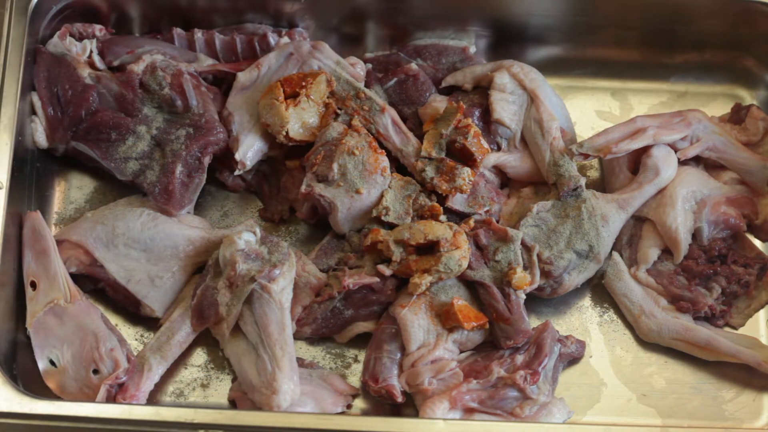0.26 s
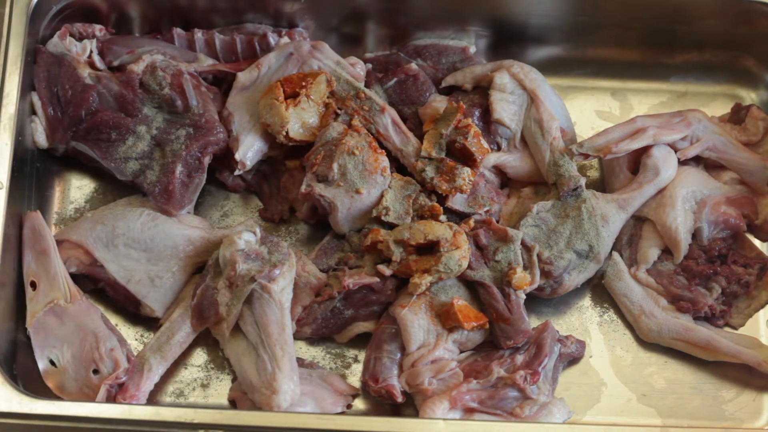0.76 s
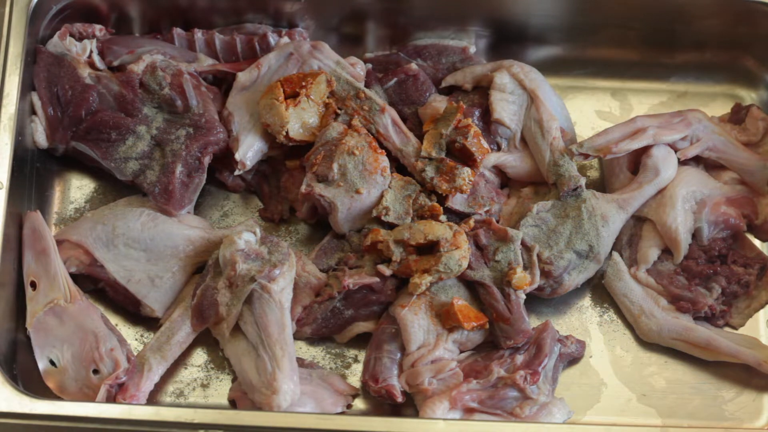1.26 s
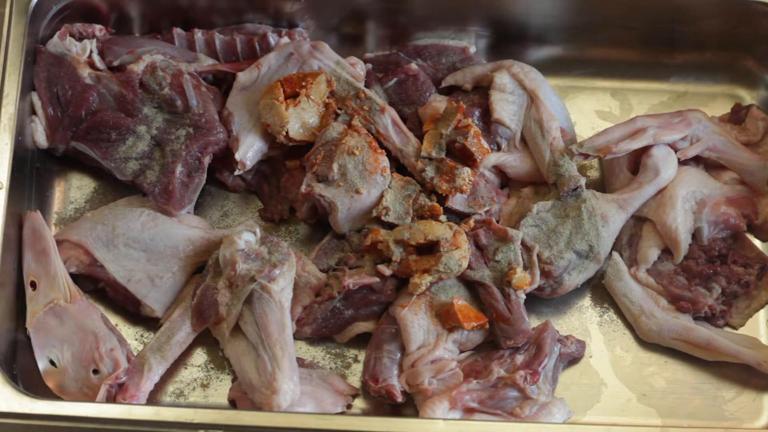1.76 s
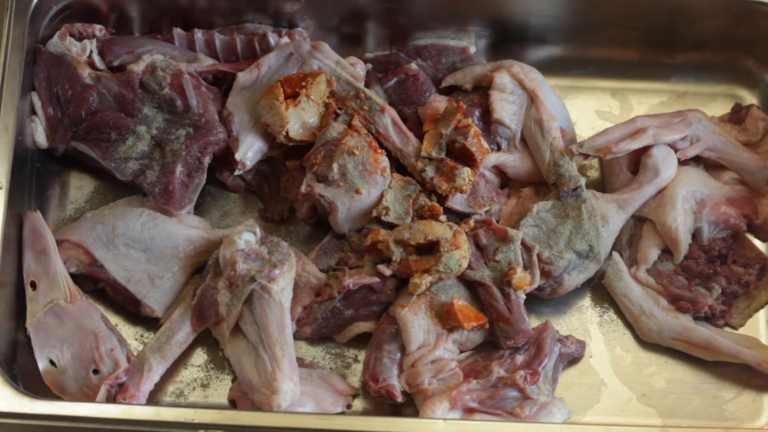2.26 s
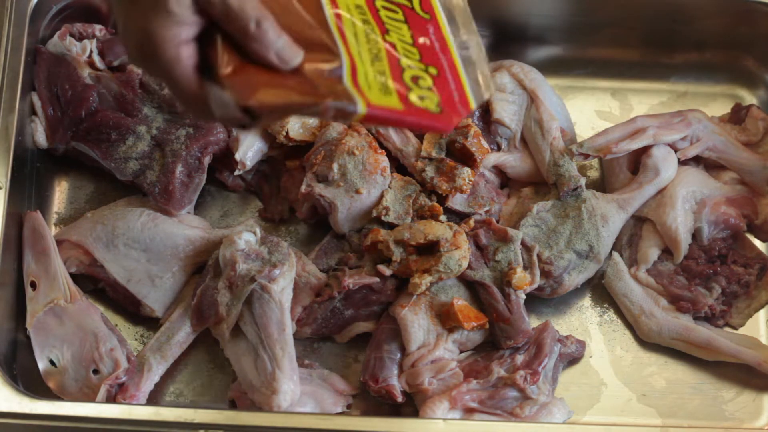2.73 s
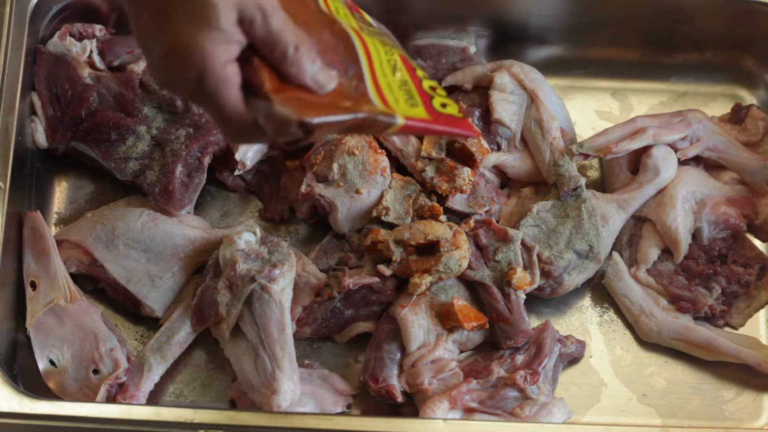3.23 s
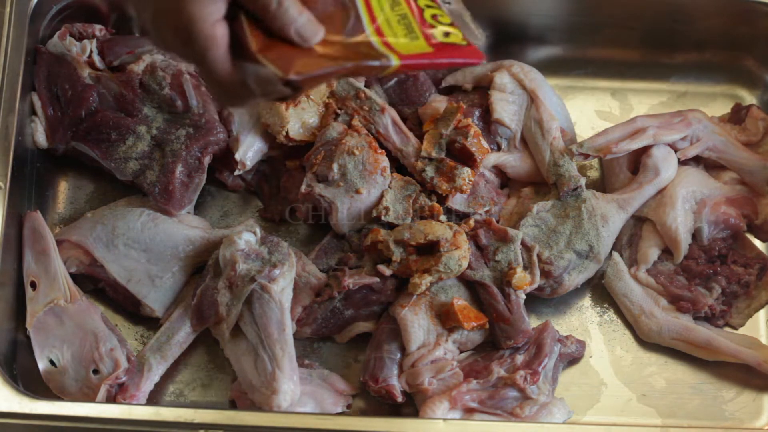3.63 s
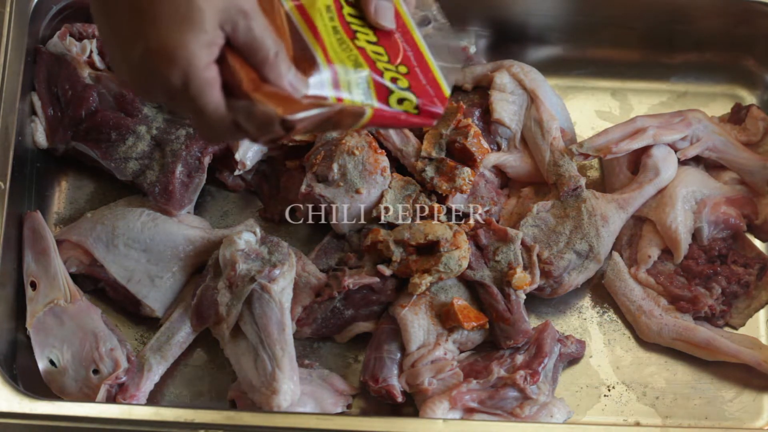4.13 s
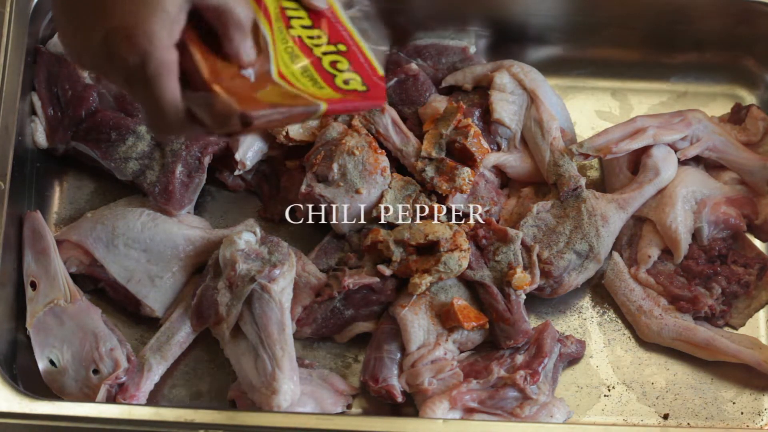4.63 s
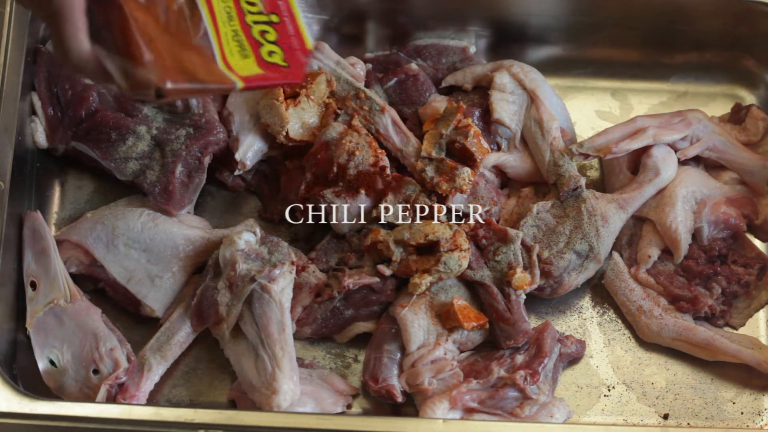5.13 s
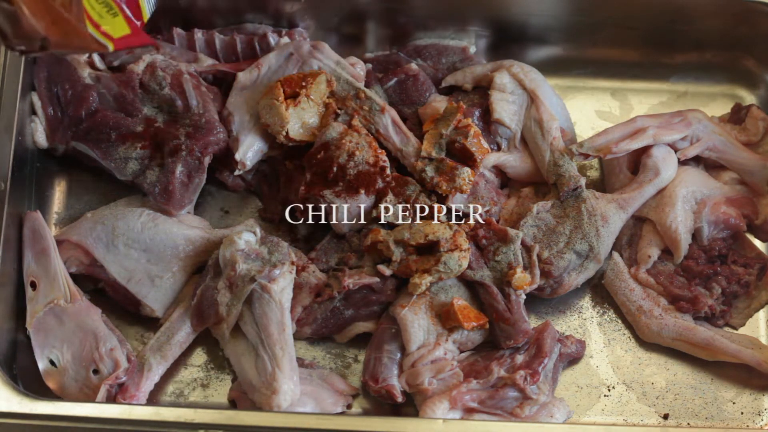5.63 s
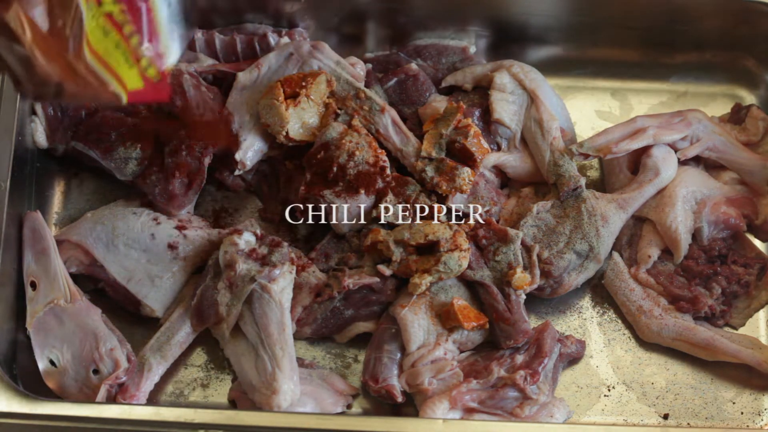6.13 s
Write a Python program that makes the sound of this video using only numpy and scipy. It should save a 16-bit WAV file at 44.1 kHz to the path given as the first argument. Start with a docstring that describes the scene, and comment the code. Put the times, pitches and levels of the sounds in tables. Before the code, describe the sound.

In a small quiet kitchen, a plastic packet of powder is handled close to the microphone. Dry, bright film snaps and fine crackle begin lightly, thicken from 0.5 to 1.3 seconds with a soft powder swish around 0.7, then thin out. A denser cluster runs from about 1.7 to 2.4, including another hollow powder slide at 1.8. At 2.5 come three very quick, faint, high steel touches. Sparse snaps follow, with sharper ones near 3.0, then a lull. A hard crack at 3.64 opens the loudest flurry, lasting to roughly 4.3. Uneven crinkling continues, with bright bursts near 4.65 and 5.4. Two close, breathy powder slides come at 5.9 to 6.0, then fainter grains and sparse ticks until the end near 6.4. Reflections are short; steady soft air, barely audible hum and thin high hiss remain underneath.

```python
"""Spice packet over a steel tray

A hand works a plastic packet in a small kitchen: the film buckles in sharp snaps (step plus ringing
flutter) and crackles finely (ticks and noise in three bands). Powder slides in the hollow of the bag
(resonated grains), steel clinks in three quick touches (decaying modes). Behind: air, faint hum, hiss."""
import sys
import numpy as np
from scipy import signal
from scipy.fft import rfft, irfft
from scipy.io import wavfile
from scipy.ndimage import uniform_filter1d, minimum_filter1d

SR = 44100
rng = np.random.default_rng(int(sys.argv[2]) if len(sys.argv) > 2 else 0)


def generate_wav(sig):
    """Save sig (samples, or channels by samples) to the path in sys.argv[1] as 16-bit PCM at SR."""
    pcm = np.round(np.clip(np.atleast_2d(sig).T, -1, 1) * 32767).astype(np.int16)
    wavfile.write(sys.argv[1], SR, pcm)


N = 281358


def gain_of(db):
    """Decibels to amplitude."""
    return 10 ** (np.asarray(db) / 20)


def evened(x):
    """Scales to rms 1."""
    return x / np.sqrt(np.mean(x ** 2) + 1e-20)


def read(points, hz):
    """Interpolates a curve at hz, straight on a log axis."""
    point_hz, value = np.transpose(points)
    return np.interp(np.log(hz + 1), np.log(point_hz + 1), value)


def add(mix, start_s, sound):
    """Mixes a sound in at start_s."""
    part = mix[round(start_s * SR):][:len(sound)]
    part += sound[:len(part)]


def colour(x, points):
    """Causal minimum-phase filter with the given spectrum."""
    spectrum_db = np.maximum(read(points, np.fft.rfftfreq(4096, 1 / SR)), -100)
    half = np.log(gain_of(spectrum_db))
    full = np.conj(signal.hilbert(np.r_[half, half[-2:0:-1]]))
    impulse = np.fft.ifft(np.exp(full)).real[:2048]
    return signal.oaconvolve(x, impulse)[:len(x)]


def resonate(x, hz, width_hz):
    """Resonance of gain 1: shifts hz down to zero, smooths, shifts back."""
    turn = np.exp(2j * np.pi * np.cumsum(hz * np.ones(len(x))) / SR)
    pole = np.exp(-np.pi * width_hz / SR)
    return 2 * (turn * signal.lfilter([1 - pole], [1, -pole], x / turn + 1e-18)).real


def ticks(per_s, spread_db, ring_ms):
    """Random slips of uneven size, each a short dying burst of noise."""
    size = gain_of(spread_db * np.minimum(rng.exponential(1, N), 4))
    slips = size * (rng.random(N) < per_s / SR)
    dying = signal.lfilter([1], [1, -np.exp(-1000 / (ring_ms * SR))], slips)
    return evened(dying * rng.standard_normal(N))


# Buckles of the film. Each row: start in seconds, energy in dB (0 = rms 1 for 1 ms),
# ring of the patch in Hz, brightness in dB per octave, flutter decay in ms.
BUCKLES = [(.0351, -31, 5210, 5, 3.1), (0.0549, -21, 5800, 3.5, 3.9), (0.0749, -18, 2600, 8, 0.68),
           (0.124, -22.5, 5100, 1, 1.6), (.181, -26, 3570, 5, 1.8), (.3555, -34, 5250, 0, 3.2),
           (0.4266, -26, 2180, 1, 4.6), (.481, -28, 5470, 1, 3.3), (.496, -21.5, 4070, 4, 2.6),
           (.531, -19, 5300, 4, 4), (0.616, -18, 6420, 5.5, 5.7), (0.6892, -28, 5470, 3, 2.7),
           (.7, -14.5, 2600, 0, 3.6), (0.7337, -12.5, 5800, 2.5, 3.4), (.8088, -14.5, 5900, 6, 1.3),
           (0.8446, -18.5, 5600, 9, 4.4), (0.935, -17.5, 6100, 5, 4.6), (0.9668, -20.5, 6200, 3, 4.6),
           (0.9912, -17.5, 4520, 5.5, 3.5), (1.004, -17.5, 5800, 6.5, 3), (1.0216, -25, 4780, 2.5, 2.2),
           (1.045, -26, 4600, 6, 3.5), (1.0567, -17.5, 5470, 3.5, 4.8), (1.1136, -20.5, 7450, 1, 3.1),
           (1.1795, -32, 8050, 8, 2.8), (1.216, -21.5, 5000, 6, 2.8), (1.263, -21, 7700, 7, 2.4),
           (1.322, -26, 7670, 6, 5.1), (1.347, -24.5, 2260, 4, 2.3), (1.447, -28.5, 2200, 2, 3.2),
           (1.52, -29, 5900, 8, 2.8), (1.5794, -25, 2110, -2, 5.9), (1.6933, -16, 2670, 1, 4.7),
           (1.737, -10.5, 5550, 0.5, 4.1), (1.7618, -12.5, 6000, 0, 1.7), (1.772, -15, 6100, 1, 4.6),
           (1.8144, -12, 2340, -7, 2.1), (1.842, -19.5, 1970, -9, 2.3), (1.894, -21.5, 4780, 5, 2.2),
           (1.9114, -16, 2420, 3, 2.2), (1.9423, -22, 3790, 2, 2.4), (1.97, -24, 2500, -1, 3.2),
           (1.9944, -14, 2230, 4, 2), (2.0607, -20, 5050, -2.5, 4.2), (2.0753, -18.5, 4780, 13, 3.8),
           (2.091, -12.5, 3100, 6.5, 2.6), (2.1032, -13, 6750, 1, 2.7), (2.114, -12, 2100, 4, 2.7),
           (2.147, -11.5, 4440, .6, 3.6), (2.1574, -19, 5800, 3, .6), (2.181, -19.5, 6500, 2, 0.66),
           (2.2345, -12, 4260, 2.5, 0.91), (2.265, -17, 4650, 0.5, 3.8), (2.349, -16.5, 5660, 3.5, 2.5),
           (2.376, -26, 1940, 2, 2.1), (2.4414, -17, 3000, -10, 3.2), (2.4416, -14, 5300, 7.5, 1),
           (2.466, -39, 2580, 7, 3.3), (2.586, -19, 5200, -1, 1.4), (2.7463, -13.5, 4800, 8, 0.43),
           (2.7828, -24, 5400, -3, 2.9), (2.8713, -30, 5300, 6, 5.6), (2.9599, -10.5, 5260, 9.5, 1.1),
           (2.9845, -12, 6340, 5, 4.1), (2.985, -14.5, 1940, -12, 2), (3.0761, -25, 4030, -2, 2.8),
           (3.1188, -17.5, 3620, 7, 1.7), (3.1218, -24, 5300, 2, 1.8), (3.1301, -19, 4050, 1.5, 1.7),
           (3.1557, -18, 2130, -1, 3.5), (3.185, -27, 3540, -7, 3.9), (3.2449, -34, 5630, -2, 2.3),
           (3.4052, -30, 5600, 1, 1.2), (3.6249, -17.5, 3640, -.5, 3.7), (3.629, -14.5, 2480, 0, 2.4),
           (3.6427, -3, 4730, 1, 0.43), (3.6492, -7, 3830, 3.5, 5.1), (3.6538, -13, 4700, 12, 1.4),
           (3.6688, -17, 4820, 2, 1.7), (3.6891, -15.5, 2300, -2, 1.7), (3.6989, -17, 2150, -2, 1.9),
           (3.7504, -13, 4360, -2, 1.1), (3.779, -25, 2450, 5, 1.9), (3.79, -19, 2500, -5, 3.4),
           (3.8012, -12.5, 5000, 6, 0.6), (3.8055, -11, 7240, 5.5, 1.2), (3.8158, -11, 3860, 9, 1.9),
           (3.8527, -27, 4570, 3, 1.8), (3.8726, -23, 5470, 0, 1.4), (3.878, -14, 2380, 5.5, 3.2),
           (3.9013, -8, 5260, 3.5, 1.9), (3.9047, -12.5, 2870, -10, 4.9), (3.941, -10.5, 2370, 6, 4.5),
           (3.9699, -8, 5500, 4.5, 2), (3.985, -9.5, 9300, 16, 2), (4.0287, -20, 4230, 9, 2.4),
           (4.045, -23, 3700, 7, 2.1), (4.0725, -19, 5560, 10, 2.5), (4.0917, -24.5, 5340, 2, 1.1),
           (4.1274, -27, 3530, -1, 2.5), (4.1339, -22, 3660, 0, 2.7), (4.18, -15.5, 5300, 5.5, 2.8),
           (4.185, -15, 4360, 4.5, 3.1), (4.1998, -17, 3570, 4, .4), (4.222, -13.5, 3070, -3, 1.1),
           (4.243, -10.5, 5560, 7, 3.1), (4.2486, -6, 3160, -1, 2.1), (4.278, -22, 4260, 6, 1.8),
           (4.3384, -19.5, 2330, 1, 2), (4.3451, -19.5, 6680, 6.5, 2.1), (4.3968, -24, 1690, -1.5, 2.5),
           (4.4436, -13.5, 5500, 15, 2.2), (4.4587, -18, 5640, -5, 1.9), (4.4996, -23, 4450, 1.5, 2),
           (4.543, -23.5, 4000, -3, 2.6), (4.587, -23.5, 2310, 0, 3.4), (4.6065, -15, 2230, 1, 2.6),
           (4.62, -18, 5000, 6, 1.5), (4.654, -14.5, 2180, -0.5, 1.7), (4.6569, -10, 5330, 6, 2.8),
           (4.668, -10, 7800, 8, 1.6), (4.6889, -12, 2670, -2, 1.6), (4.752, -16.5, 5800, 6, 5.4),
           (4.7595, -14.5, 4280, 4.5, 2.4), (4.7746, -16.5, 3140, 0, 5), (4.8009, -20.5, 3490, 0, 3.1),
           (4.82, -21.5, 2330, 4.5, 1.7), (4.8831, -20, 2260, 0.5, 2.6), (4.9036, -24, 2500, -2, 2.3),
           (4.9138, -16.5, 6030, 2, 3.5), (4.9417, -20, 5100, 8, 2.5), (4.9833, -19.5, 4220, -3, 1.7),
           (4.9961, -22.5, 4400, 1.5, 2.1), (5.042, -19.5, 4360, 3, 3.6), (5.0873, -28.5, 3400, 0, 2.5),
           (5.123, -17.5, 4730, 3.5, 2.7), (5.214, -28, 7800, 1, 4.7), (5.2222, -24, 2860, -4, .8),
           (5.2407, -18, 2340, -5, 2.9), (5.2455, -12.5, 3970, 3.5, 1.2), (5.311, -14, 4550, 3, 3),
           (5.3475, -16, 8700, 5.5, 2.5), (5.3667, -18, 3660, -4, 5.4), (5.369, -21, 7940, 12, 2.8),
           (5.401, -12, 7950, 5.5, 1.5), (5.4188, -8.5, 8200, 3.5, 1.04), (5.4446, -19.5, 4950, 22, 4.2),
           (5.451, -16.5, 5660, 3, 2.7), (5.522, -24, 2370, -10, 2.1), (5.5347, -17.5, 4300, 6, 4.4),
           (5.539, -22, 2440, -9, 2.1), (5.5573, -14.5, 3600, 3.5, 2.4), (5.567, -15.5, 5270, 8, 1.8),
           (5.5756, -16, 4570, 5, .9), (5.6005, -26, 4440, -3, 3.6), (5.7015, -25.5, 2580, -1.5, 3.9),
           (5.7659, -17.5, 2820, 4.5, 1.4), (5.785, -19, 2940, 4.5, 5.3), (5.789, -18.5, 6140, 8, 2.6),
           (5.8516, -24, 3000, -2, 2.6), (5.8738, -22, 3630, -2, 3), (5.903, -31, 2430, 6, 1.8),
           (5.942, -16, 2670, 2, 4.2), (5.952, -21, 2630, 5, 4.2), (5.97, -17, 2380, -3, .96),
           (6.0184, -16, 4480, -2, 2), (6.043, -26, 2500, -9, 4.6), (6.0729, -19, 2560, 0.5, 2.1),
           (6.13, -27.5, 2630, -3, 3.7), (6.2286, -28.5, 2710, 3, 1.2), (6.239, -26.5, 7700, 19, 3.1),
           (6.27, -23, 8250, 1, 3.3)]
# Tone of the packet. Each row: frequency in Hz, relative density in dB per Hz.
FILM_SPECTRUM = [(150, -93.5), (250, -50.5), (433, -47), (471, -35), (1430, -1.5), (2480, 2), (3560, -0.5),
                 (5190, -1), (7820, -5.5), (14000, -21), (15000, -25)]
STEP_DB, STEP_DB_PER_MS = 12, -3.5  # step over flutter: the shorter the flutter, the harder the step
DEPTH_DB, DEPTH_PER_TILT = -2, .7  # gain under 1.7 kHz, rising with the brightness


def snaps():
    """Each buckle: an abrupt step, then a flutter of the freed patch, ringing at its own pitch."""
    out, t = np.zeros(N), np.arange(512) / SR
    hz = np.fft.rfftfreq(1024, 1 / SR)
    deep = 1 / (1 + (hz / 1700) ** 6)
    octaves = np.log2(np.clip(hz, 2000, 14000) / 4500)
    fade = signal.windows.tukey(2 * len(t), .4)[len(t):]
    rows = BUCKLES + small_snaps()
    noises = rng.standard_normal((len(rows), 512))
    for (start_s, db, ring_hz, tilt_db, decay_ms), noise in zip(rows, noises):
        flutter = noise * np.exp(-1000 * t / max(decay_ms, .2)) * np.minimum(t / .0001, 1)
        step_db = STEP_DB + STEP_DB_PER_MS * decay_ms
        step = gain_of(step_db) * np.exp(-((t - .0002) / .00003) ** 2)
        drive = (flutter + step) * fade
        depth_db = DEPTH_DB + DEPTH_PER_TILT * tilt_db
        tone = gain_of(tilt_db * octaves + depth_db * deep)
        drive = irfft(rfft(np.r_[np.zeros(32), drive], 1024) * tone)  # 32 samples of lead-in
        ringing = drive + 1.42 * resonate(drive, ring_hz, 0.15 * ring_hz)
        sound = colour(ringing, FILM_SPECTRUM)
        duration_ms = len(sound) / SR * 1000
        add(out, start_s - 32 / SR, gain_of(db) * evened(sound) / np.sqrt(duration_ms))
    return out


SMALL_COUNT = 45
SMALL_DB, SMALL_SPREAD_DB = 10.5, 1.5  # over the crackle of the moment
SMALL_HZ, SMALL_TILT_DB, SMALL_MS = (2270, 6650), (0, 4), (1.8, 5.9)  # ranges: ring, brightness, decay


def small_snaps():
    """More buckle rows, at random moments, their energy following the crackle."""
    when, size, ring, tilt, decay = rng.random((SMALL_COUNT, 5)).T
    start_s = .02 + when * (N / SR - .05)
    db = crackle_db(start_s) + SMALL_DB + SMALL_SPREAD_DB * (2 * size - 1)
    ring_hz = np.exp(np.interp(ring, [0, 1], np.log(SMALL_HZ)))
    tilt_db = np.interp(tilt, [0, 1], SMALL_TILT_DB)
    decay_ms = np.interp(decay, [0, 1], SMALL_MS)
    return list(zip(start_s, db, ring_hz, tilt_db, decay_ms))


# The hand on the packet. Each row: time in seconds, crackle level in dB,
# added brightness of the edge over the body in dB.
HANDLING = [(0, -49.5, 6), (.13, -41.5, 4), (.23, -46, 2), (.36, -52.5, 1.5), (.46, -48, 3),
            (.58, -37.5, 6), (.66, -37, 3), (.75, -32, -0.5), (.88, -38.5, 1), (1.04, -38, 1),
            (1.17, -42, 1), (1.3, -40, 2.5), (1.48, -51, -3), (1.62, -45.5, -4), (1.76, -33.5, -3),
            (1.9, -41, -5), (2.05, -41, -1), (2.13, -39.5, 5), (2.3, -38, -4.5), (2.44, -49, -1),
            (2.57, -48.5, 1), (2.71, -55.5, 4), (2.8, -48.5, 8), (2.93, -44, 6.5), (3.02, -38, 5),
            (3.09, -49, 2), (3.18, -48.5, 3), (3.36, -54.5, 3), (3.46, -44.5, -2.5), (3.53, -44.5, 0),
            (3.6, -50.5, -4), (3.68, -33, 6), (3.79, -40.5, -1.5), (3.89, -32, -1), (4.03, -39, 6),
            (4.16, -47, -4), (4.26, -35, 5), (4.41, -47, 3), (4.56, -48, -4), (4.7, -36, 1),
            (4.85, -42.5, -3), (5.03, -47, 4), (5.2, -48.5, 0), (5.36, -45, -4), (5.5, -46, -0.5),
            (5.62, -42.5, 4), (5.73, -51.5, -6), (5.85, -45.5, 6), (5.97, -37, 1), (6.12, -52.5, 0),
            (6.22, -53, 1), (6.38, -47.5, -2)]
SETTLE_DB, SETTLE_S = -24.5, 0.023  # start level against the buckle, decay of power


def crackle_db(t):
    """Level of the crackle: the hand's effort plus the film settling after each listed buckle."""
    start_s, db = np.transpose(BUCKLES)[:2]
    after_s = t[:, None] - start_s
    dying = np.exp(-np.maximum(after_s, 0) / SETTLE_S) * (after_s > 0)
    settle_power = (gain_of(db + SETTLE_DB) ** 2 * dying).sum(1)
    hand_db = np.interp(t, *np.transpose(HANDLING)[:2])
    return 10 * np.log10(gain_of(hand_db) ** 2 + settle_power)


# edge and body follow the crackle in part, around MEAN_DB
CRISP_DB, CRISP_FOLLOW, BODY_DB, BODY_FOLLOW, MEAN_DB = -47, 0.77, -48, 0.69, -44


def crackle():
    """Thousands of tiny creases over noise; body, middle and crisp edge follow the hand."""
    creases = ticks(2500, 4.9, 0.64) + 1.45 * rng.standard_normal(N)
    grains = evened(colour(creases, FILM_SPECTRUM))
    hz, t, z = signal.stft(grains, SR, nperseg=256)
    power = np.mean(abs(z) ** 2, 1)
    bands_hz = ((3500, 7000), (7000, 15000), (900, 1900))  # middle, edge, body
    shares = [power[(hz > lo) & (hz < hi)].sum() / power.sum() for lo, hi in bands_hz]
    level_db = crackle_db(t)
    bright_db = np.interp(t, *np.transpose(HANDLING)[::2])
    crisp_db = CRISP_DB + CRISP_FOLLOW * (level_db - MEAN_DB) + bright_db / 2
    body_db = BODY_DB + BODY_FOLLOW * (level_db - MEAN_DB) - bright_db / 2
    levels_db = (level_db, crisp_db, body_db)
    middle, crisp, body = (db - 10 * np.log10(share) for db, share in zip(levels_db, shares))
    # -1 body, 0 middle, 1 edge
    up = np.interp(np.log(hz + 1), np.log([1500, 4500, 10000]), [-1, 0, 1])[:, None]
    gain_db = (1 - abs(up)) * middle + np.maximum(up, 0) * crisp + np.maximum(-up, 0) * body
    smooth = uniform_filter1d(rng.standard_normal(z.shape[::-1]), 8, 0)
    patches = evened(uniform_filter1d(smooth, 8, 1)).T  # uneven over time and pitch
    return signal.istft(z * gain_of(gain_db + 1.5 * patches), SR, nperseg=256)[1][:N]


# Powder slides. Each row: loudest moment in seconds, level there in dB, pitch of the hollow in Hz,
# rise in dB per second, fall in dB per second.
SLIDES = [(.72, -37, 2720, 400, 148), (1.819, -29, 2160, 222, 259), (5.905, -26.5, 2530, 3000, 122),
          (5.96, -25.5, 2700, 250, 154), (6.14, -44, 2350, 150, 117), (6.348, -35.5, 3100, 1200, 5)]
HOLLOW_WIDTH_HZ = 1250  # of each of three resonances in a row


def powder():
    """Grains tumbling on the film excite the air hollow of the bag."""
    t, out = np.arange(N) / SR, np.zeros(N)
    grains = colour(ticks(4000, 2.1, 1.4), FILM_SPECTRUM)
    for peak_s, db, hz, rise_db, fall_db in SLIDES:
        level_db = db - np.maximum(rise_db * (peak_s - t), fall_db * (t - peak_s))
        span = level_db > -65
        hollow = grains[span]
        for _ in range(3):
            hollow = resonate(hollow, hz, HOLLOW_WIDTH_HZ)
        out[span] += gain_of(level_db[span]) * evened(hollow)
    return out


# Touches of the steel. Each row: start in seconds, level in dB before the bass is thinned.
TOUCHES = [(2.511, -50), (2.518, -44), (2.541, -49)]
# Modes of the steel. Each row: frequency in Hz, level in dB before the bass is thinned, t60 in seconds.
STEEL_MODES = [(4650, 0, .12), (9050, -1, .12), (9420, 0, .07), (9690, 3, .05), (10300, -2, .05),
               (11250, -6, .12), (11400, -8, .15), (13450, -12, .15), (13700, -14, .15)]


def clinks():
    """A small steel thing is brushed: each touch is a few ms of scraping into its modes."""
    out, t = np.zeros(N), np.arange(SR // 2) / SR
    ring = sum(gain_of(db - 60 * t / t60_s) * np.sin(2 * np.pi * hz * t) for hz, db, t60_s in STEEL_MODES)
    scrapes = rng.standard_normal((len(TOUCHES), 200)) * np.hanning(200)
    for (start_s, db), scrape in zip(TOUCHES, scrapes):
        add(out, start_s, gain_of(db) * np.convolve(ring, scrape / np.linalg.norm(scrape)))
    return np.diff(out, prepend=0)  # thin steel radiates no bass


# Decay of the kitchen. Each row: frequency in Hz, t60 in seconds.
KITCHEN_T60 = [(1000, 0.22), (3000, 0.18), (8000, 0.19), (15000, 0.25)]


def room(x):
    """Sparse reflections of random sign from tray and walls, each band dying at its own speed."""
    taps = np.zeros(SR // 2)
    at = np.arange(120, len(taps) - 20, 10)
    taps[at + rng.integers(0, 10, len(at))] = rng.choice([-1., 1.], len(at))
    hz, t, z = signal.stft(taps, SR, nperseg=256)
    decay = gain_of(-60 * t / read(KITCHEN_T60, hz)[:, None])
    tail = signal.istft(z * decay, SR, nperseg=256)[1]
    return signal.fftconvolve(x, tail / np.linalg.norm(tail))[:N]


# Kitchen air. Each row: frequency in Hz, relative density in dB per Hz.
AIR_SPECTRUM = [(20, -48), (200, -45), (350, -25.5), (600, -14), (900, -4), (2200, -1), (5000, -6),
                (10000, -11.5), (15000, -17.5)]
AIR_DB = -50.5
# Hum of a distant appliance. Each row: frequency in Hz, width in Hz, level in dB.
HUM_LINES = [(352.2, 6.8, -90.5), (478, 7.3, -86.5)]


def air():
    """Steady noise of the kitchen with two wavering hum lines, each noise through narrow resonances."""
    out = gain_of(AIR_DB) * evened(colour(rng.standard_normal(N), AIR_SPECTRUM))
    for hz, width_hz, db in HUM_LINES:
        narrow = resonate(rng.standard_normal(N), hz, width_hz)
        out += gain_of(db) * evened(resonate(narrow, hz, width_hz))
    return out


def scene():
    """Packet and steel in the kitchen, the same in both channels."""
    near = snaps() + clinks()
    rustle = crackle() + powder()
    reflections = gain_of(-6.0) * room(near) + gain_of(-10.0) * room(rustle)
    mid = near + rustle + reflections + air()
    return np.array([mid, mid])


# Overall tone: slightly thinned lows, steep treble cut above 15.2 kHz.
# Each row: frequency in Hz, gain in dB.
OVERALL_TONE = [(150, -1), (320, -5), (15150, 0), (15350, -25.5), (17000, -30.5)]
# Hiss of each amplifier channel. Each row: frequency in Hz, relative density in dB per Hz.
HISS_SPECTRUM = [(300, -40), (1000, -31), (3000, -23), (6000, -11.5), (10000, 1.5), (14000, 6),
                 (15100, 0.5), (15300, -34.5)]
HISS_DB, EDGE_HZ = -59.5, 16900


def record(dry):
    """Overall tone, a fast peak limiter, each channel's own hiss, band limit."""
    mid = colour(dry.mean(0), OVERALL_TONE)
    headroom = np.minimum(.92 / (abs(mid) + 1e-9), 1)
    held = uniform_filter1d(minimum_filter1d(headroom, size=129), size=65)
    limited = mid * uniform_filter1d(held, size=64)
    noises = rng.standard_normal((2, N))
    hiss = [gain_of(HISS_DB) * evened(colour(noise, HISS_SPECTRUM)) for noise in noises]
    lowpass = signal.firwin(255, EDGE_HZ, window=("kaiser", 9), fs=SR)
    return signal.oaconvolve(limited + np.array(hiss), lowpass[None], "same")


dry = scene()
out = record(dry)
generate_wav(out)
```